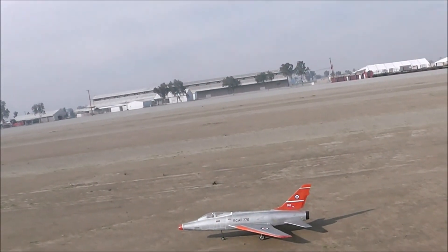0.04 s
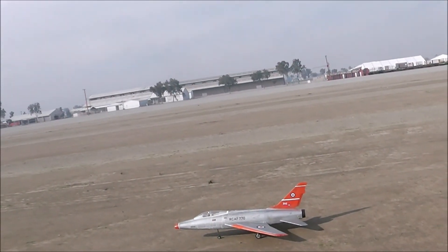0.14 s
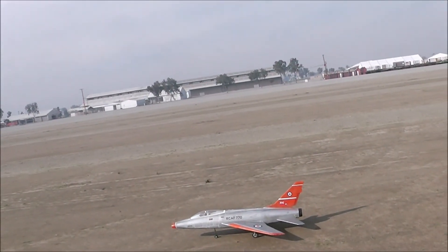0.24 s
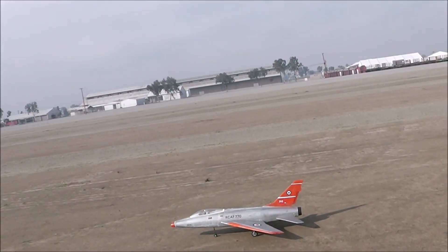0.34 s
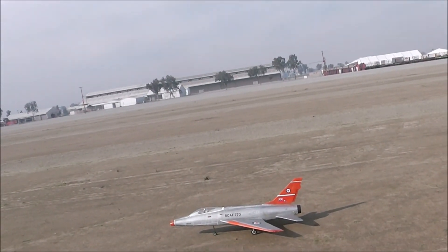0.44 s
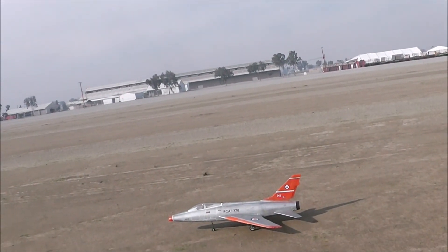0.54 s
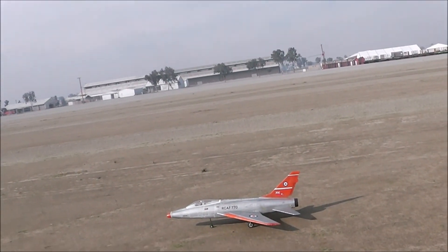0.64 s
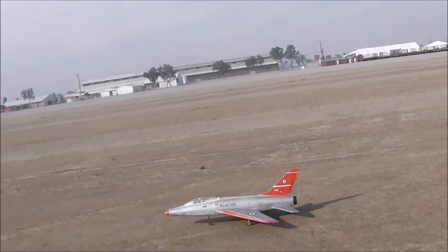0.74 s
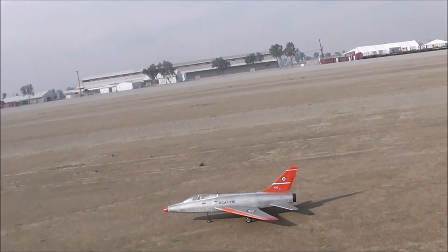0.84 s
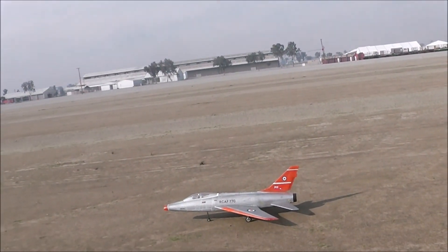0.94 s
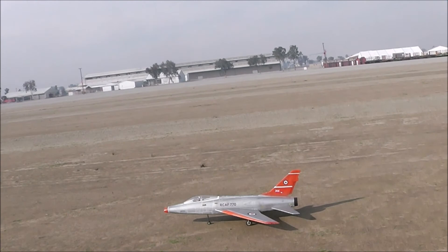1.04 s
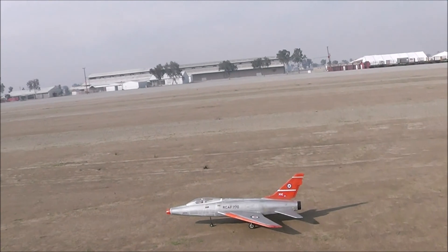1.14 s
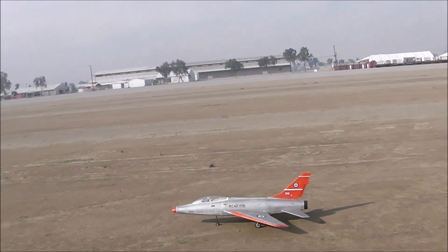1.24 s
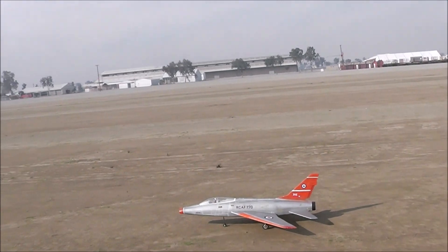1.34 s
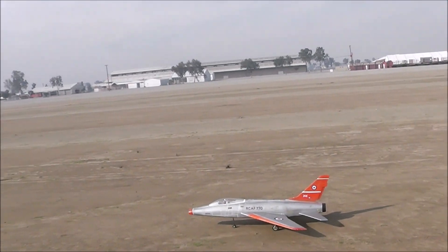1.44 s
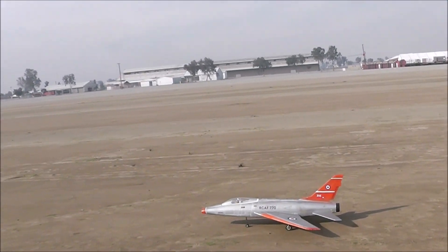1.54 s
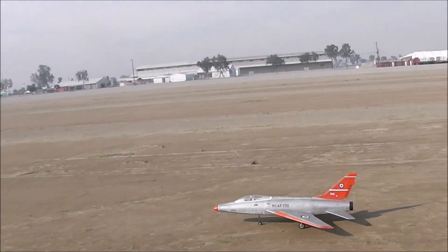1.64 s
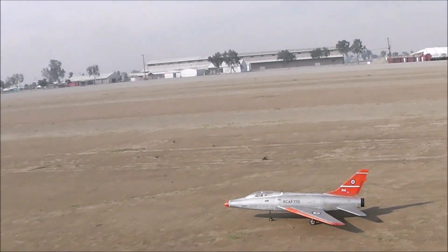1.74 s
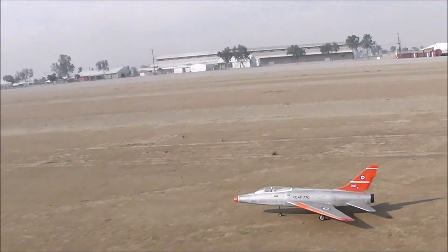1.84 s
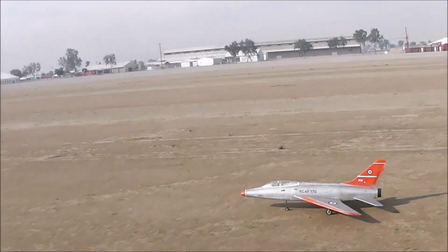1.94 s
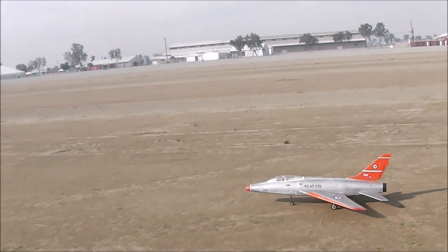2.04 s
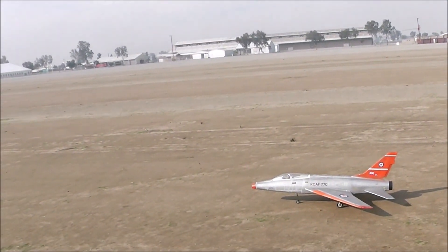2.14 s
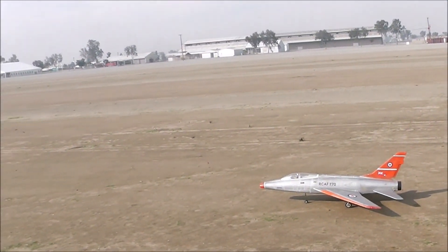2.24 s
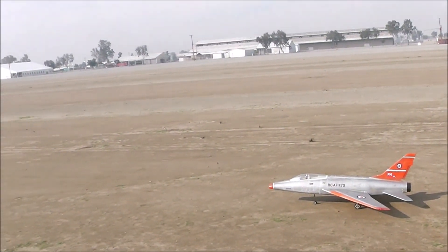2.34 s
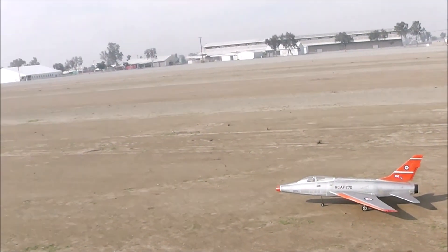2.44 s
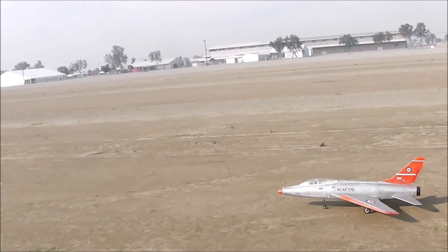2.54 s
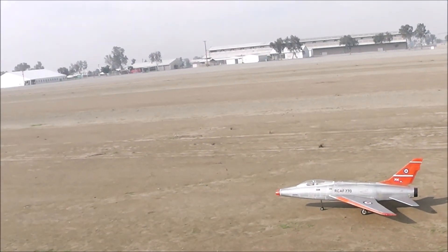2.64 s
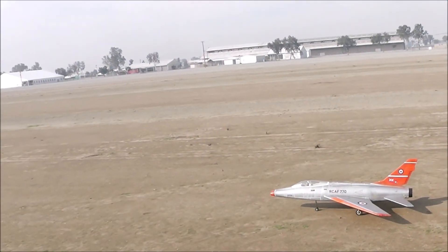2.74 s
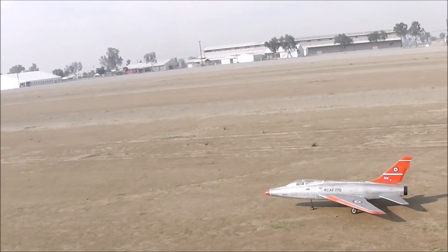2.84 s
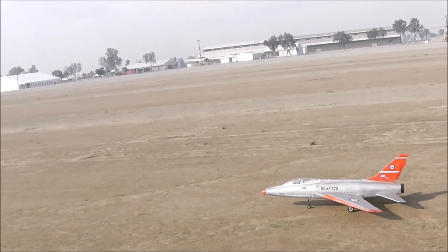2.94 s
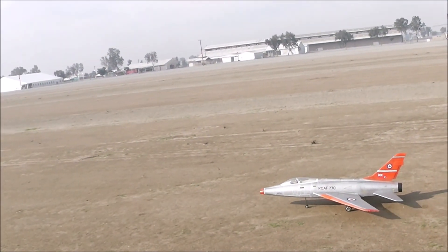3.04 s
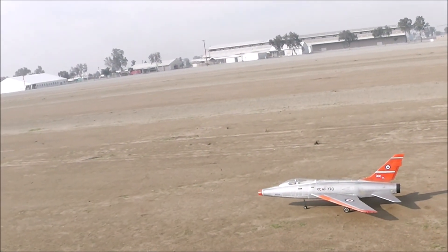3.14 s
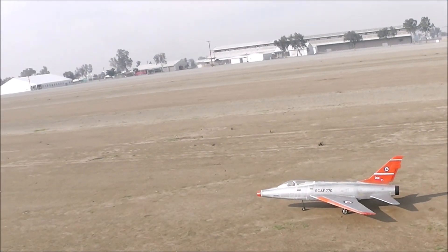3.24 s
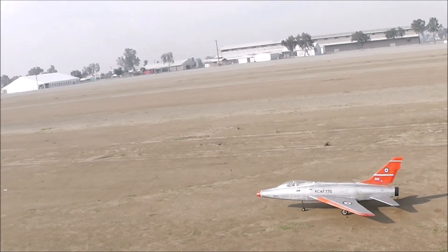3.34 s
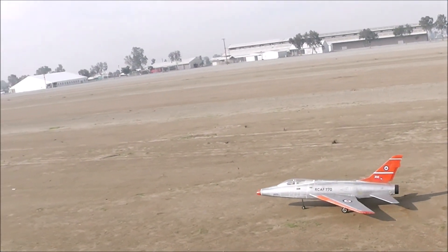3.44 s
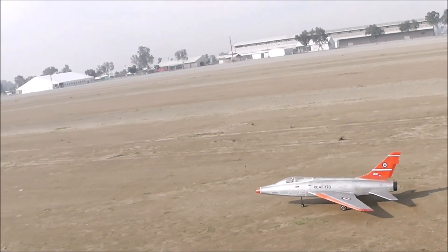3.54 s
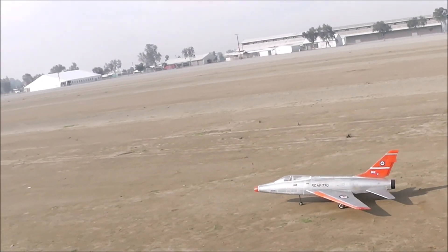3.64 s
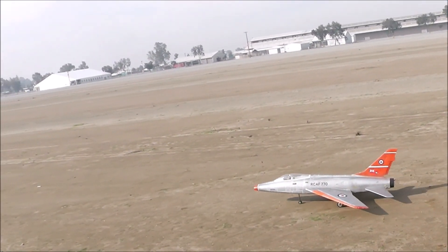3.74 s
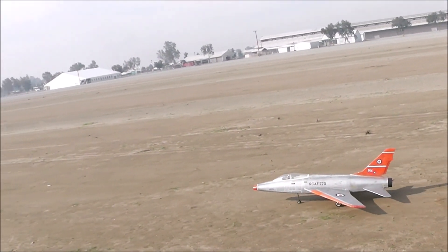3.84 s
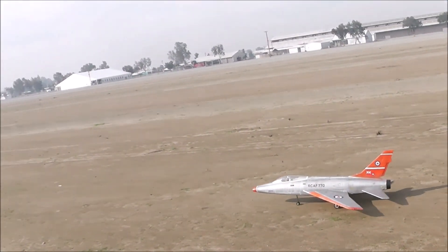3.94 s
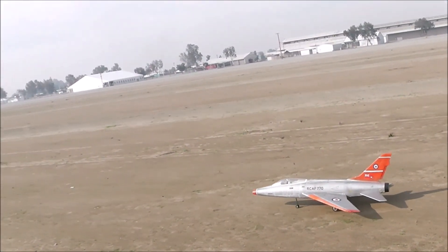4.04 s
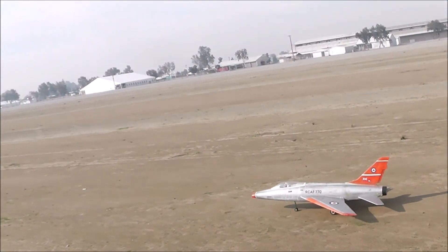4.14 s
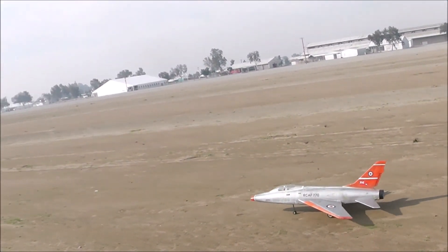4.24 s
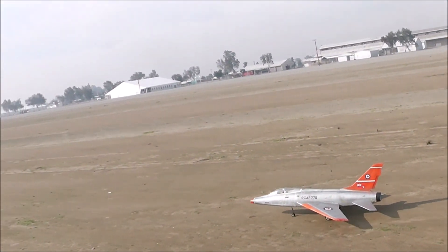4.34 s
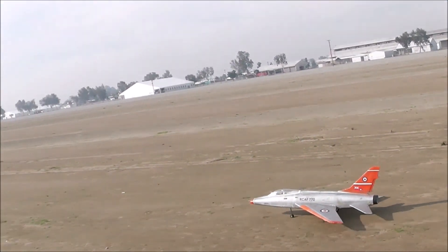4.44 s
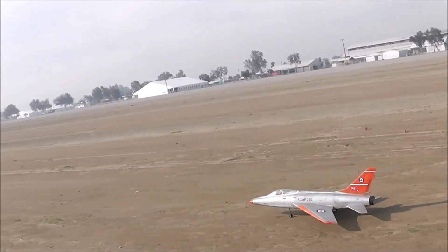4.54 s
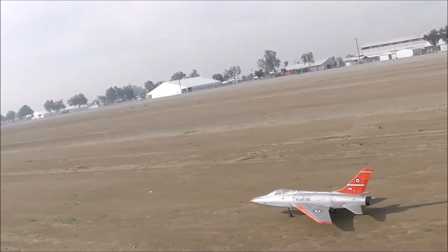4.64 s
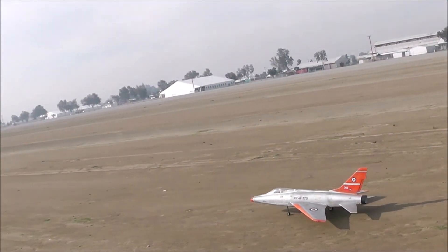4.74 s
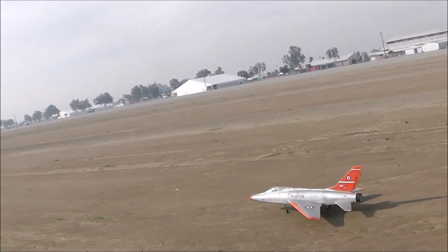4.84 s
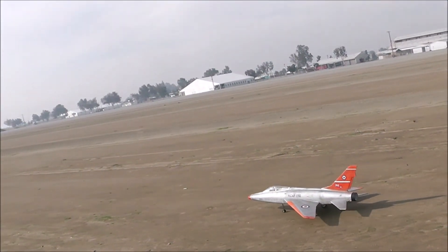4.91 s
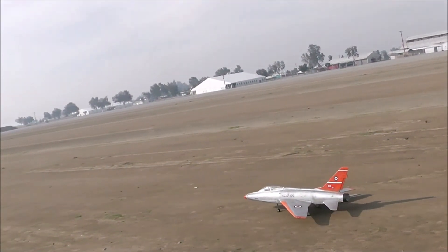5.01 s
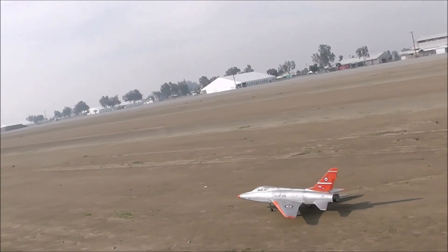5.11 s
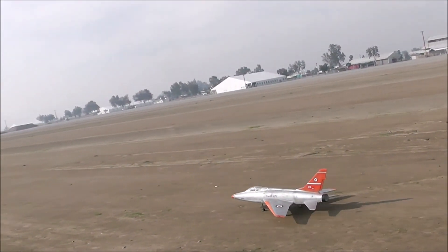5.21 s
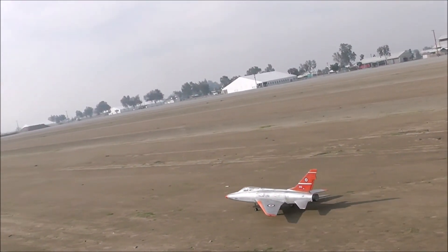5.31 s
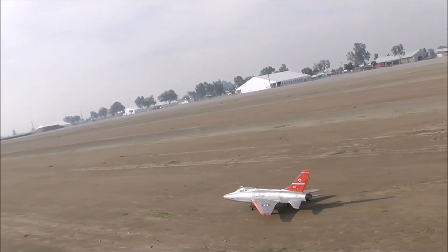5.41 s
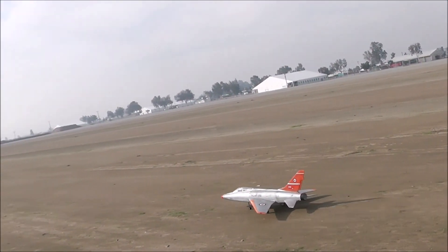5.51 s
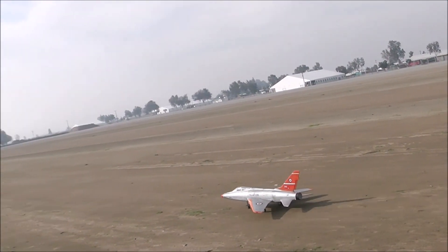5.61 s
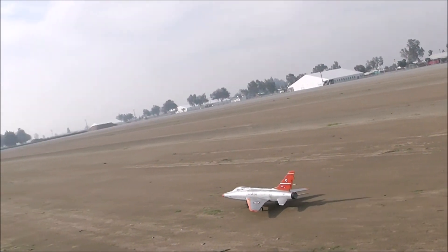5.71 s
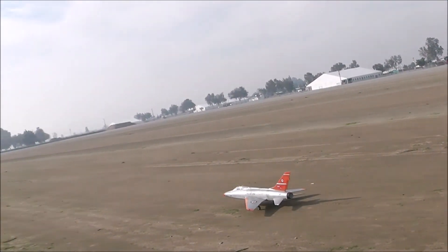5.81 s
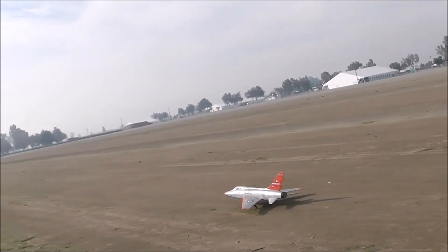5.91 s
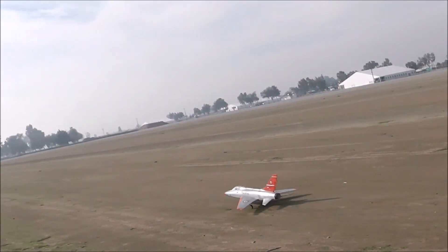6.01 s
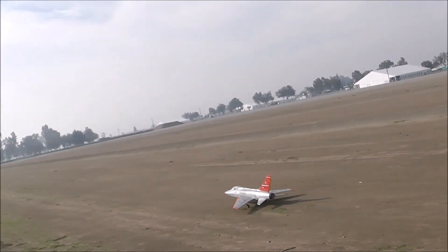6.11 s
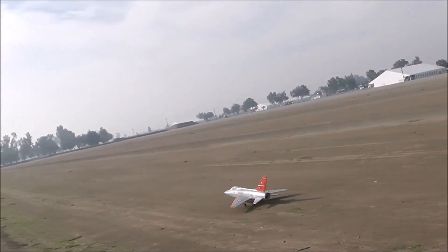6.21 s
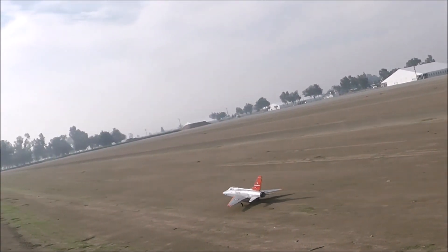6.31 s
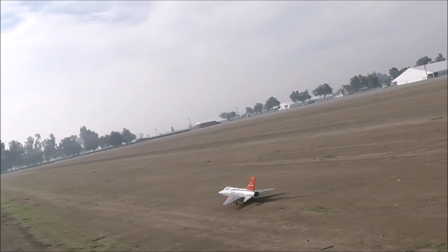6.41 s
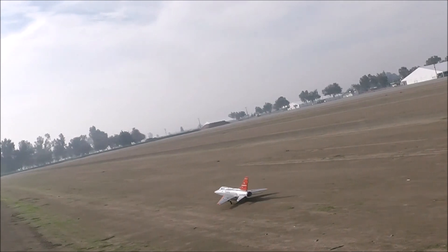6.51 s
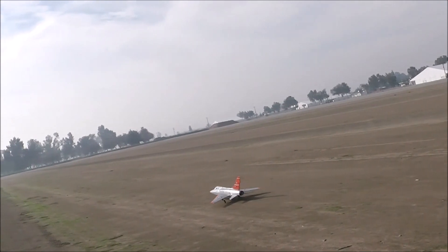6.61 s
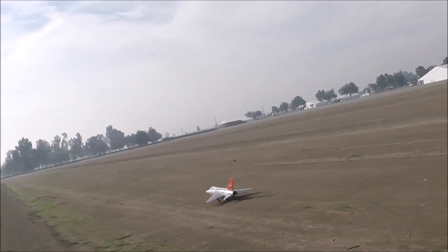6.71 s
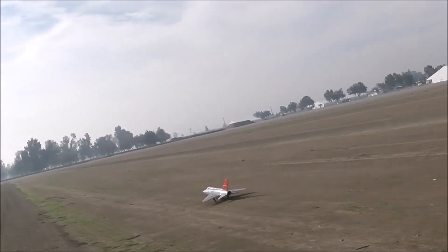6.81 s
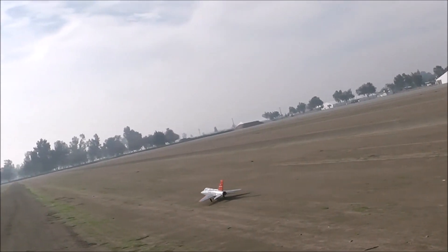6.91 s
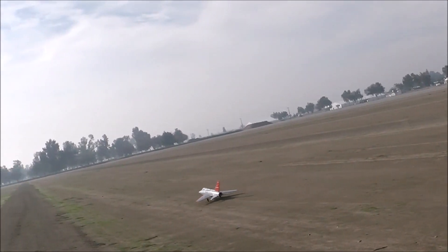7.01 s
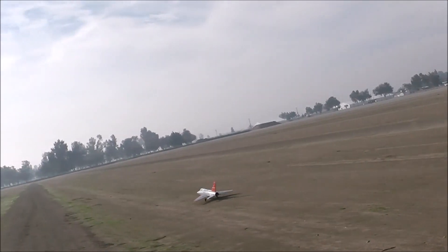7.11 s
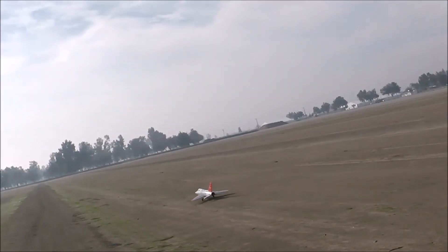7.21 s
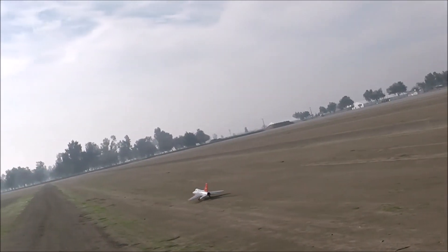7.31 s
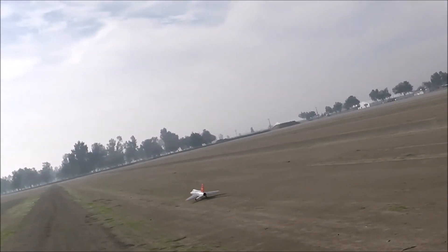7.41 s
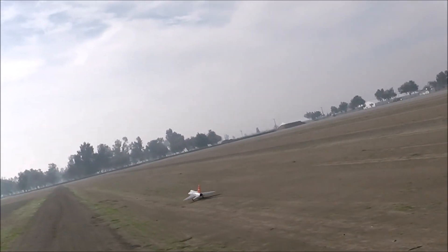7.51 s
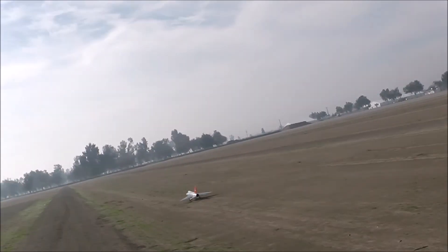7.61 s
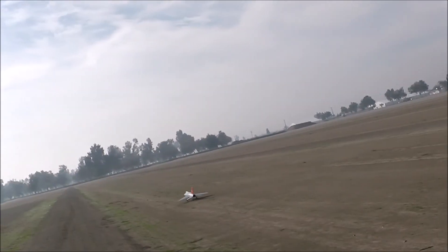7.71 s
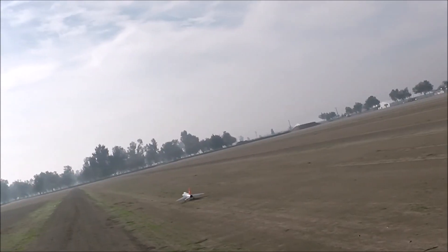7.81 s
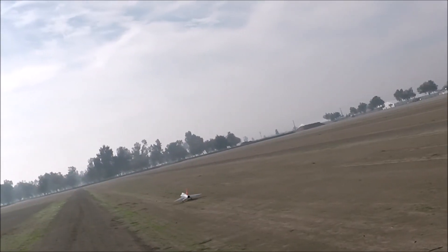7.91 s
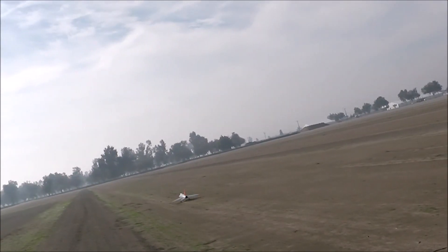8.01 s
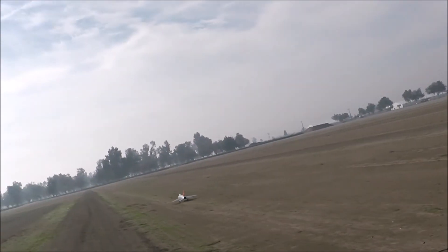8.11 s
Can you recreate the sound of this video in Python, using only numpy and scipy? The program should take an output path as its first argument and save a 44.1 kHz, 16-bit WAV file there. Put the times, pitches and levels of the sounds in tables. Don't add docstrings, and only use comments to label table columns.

```python
import sys
import numpy as np
from scipy import signal
from scipy.fft import rfft, irfft
from scipy.io import wavfile
from scipy.ndimage import uniform_filter1d, map_coordinates

SR = 44100
rng = np.random.default_rng(int(sys.argv[2]) if len(sys.argv) > 2 else 0)


def transcribe(signal):
    frames = np.atleast_2d(signal).T
    limited = np.clip(frames, -1, 1)
    pcm = np.round(limited * 32767).astype(np.int16)
    wavfile.write(sys.argv[1], SR, pcm)


def to_linear_factor(level_db):
    exponent = np.asarray(level_db, float) / 20
    return 10 ** exponent


N = 359944
START_HZ, EASE, CRUISE_HZ = 56, 1.8, 324
PANEL_FADE_DB, PANEL_FADE_RATE = 1, 5
WHINE_FADE_DB, WHINE_FADE_RATE = 3, 7
FAR_LOSS_DB_PER_KHZ = 0.03
FAR_FROM_S = 5.95
DUCT_TOP_HZ, DUCT_TOP_DB_PER_KHZ = 15400, -22

# (time [s], shaft speed it settles at [Hz], time to get there [s])
THROTTLE = [(1.115, 134.1, .17), (1.3, 149.5, 0.2), (1.63, 181.9, .13), (1.72, 196.9, .28),
            (1.972, 216, 0.18), (2.165, 232.5, 0.34), (2.52, 245, 0.18), (2.72, 254, 0.15),
            (2.91, 261.5, 0.088), (3.05, 276, 0.13), (3.27, 291.3, .15), (3.865, 303, 0.084),
            (3.95, 297.5, 0.077), (4.735, 318, 0.13), (4.831, 368, 0.15), (5.045, 387, .09),
            (5.15, 391.5, .3), (5.449, 388.5, 0.67), (5.945, 405, .13), (6.14, 415.5, 0.078),
            (6.291, 426.5, 0.16), (6.5, 431, .2), (6.771, 437, .09), (6.96, 440.5, 0.22), (7.265, 446, .1),
            (7.4, 444.8, 0.52), (7.849, 450.5, .1)]
# (time [s], level [dB])
HUM = [(1.08, -48), (1.6, -29.5), (1.74, -16.5), (1.9, -18.5), (2.2, -13.5), (2.43, -17), (2.85, -7),
       (3.3, -6), (3.48, -10), (3.85, -10), (4.13, -17), (4.57, -12.5), (4.78, -15.5), (4.93, -9.5),
       (5.7, -8.5), (6.4, -17), (6.7, -21), (8.16, -25.5)]
# (time [s], width [s], depth [dB])
HUM_NULLS = [(2.01, 0.034, -9), (3.05, 0.032, -1), (4.07, 0.045, -3), (4.83, 0.037, -10), (6.08, 0.1, -11),
             (6.63, 0.053, -7.5)]
# (beats a turn, level at cruise [dB], slope below cruise [dB per octave], change when away [dB])
OVERTONES = [
    (2, -20, 9, -2),
    (3, -28, 11, 24.5),
    (4, -24.5, 19, -15.5),
    (5, -31.5, 10, -9.5),
    (6, -28, 9, -21),
    (7, -31.5, 3.5, -3),
]
# (pitch [Hz], width [Hz], gain [dB])
AIRFRAME = [(348, 48, -1), (483.6, 23.3, 4), (531, 15, 2.5), (602, 24, -3.5), (800, 61, 4.5),
            (882, 46, -1.5), (1170, 210, -1.5), (1252.6, 70, 2.5), (1490, 140, 0), (1727, 71, -0.5),
            (2090, 63, -1)]
# (boost of every third beat [dB], fade start [s], fade length [s])
COGGING = (8.8, 1.65, 0.4)
# (time [s], duration [s], gain [dB])
CASING_HIDDEN = (4.86, 0.042, -29)
# (time [s], duration [s], gain [dB])
PANELS_HIDDEN = (6.5, 0.066, -15)
# (time [s], duration [s], gain [dB])
CASING_FACES = (3.95, 0.61, 9.9)
# (beats a turn, level at cruise [dB], slope below cruise [dB per octave], change when away [dB])
BLADE_TONES = [
    (12, -36.5, 5, 24),
    (24, -28.5, 22.5, 8),
    (36, -26, 34, -8),
]
# (pitch [Hz], width [Hz], gain [dB])
DUCT = [(1000, 200, 10), (1550, 210, 7.5), (2800, 130, -2.5), (3580, 400, -2.5), (4200, 460, 1),
        (4780, 230, 1.5), (5094, 105, 10.5), (5700, 2100, 1.5), (7400, 4400, -1.5), (8650, 2870, 3.5),
        (11260, 482, -1.5), (14800, 2230, -5)]
# (time [s], gain [dB])
BEAM = [(1.08, -1.7), (1.6, -0.5), (2.1, -1), (2.4, 7.5), (3.2, -0.5), (3.45, -14), (3.75, 3.5), (4.8, 3),
        (5.0, 4.2), (5.4, -0.5), (5.75, 0), (6.8, 2), (7.8, 1), (8.16, -4)]
# (time [s], level [dB])
UNEQUAL_BLADES = [(4.7, -80), (5.15, -32), (6.25, -29), (6.7, -80)]
# (time [s], pitch [Hz], level [dB])
WHISTLE = [(1.065, 11860, -52), (1.15, 11900, -43), (1.7, 11840, -47), (2.1, 11810, -51), (2.6, 11860, -37),
           (2.9, 12100, -44), (3.1, 12000, -54), (4.8, 11800, -52), (5.0, 11770, -71)]
# (time [s], level [dB], away [0-1])
FLOW = [(1.1, -34, 0.4), (1.25, -18, 0.28), (1.6, -13, 0.27), (1.72, -9.5, 0.06), (2.3, -5, 0),
        (2.95, -1, 0.04), (3.4, -0.5, 0.05), (3.95, 1.2, 0.05), (4.5, 0.5, 0), (4.9, 2.5, 0.11),
        (5.15, -1.5, 0.16), (5.65, 2.5, .4), (6.2, 2.5, 0.47), (6.7, 0, 0.57), (6.8, 3, 0.45),
        (7.1, 1.35, 0.31), (7.8, -4, 0.13), (8.16, -5.5, 0.2)]
# (level at full flow [dB], follow [dB per dB of flow], change when away [dB], drift once far [dB per s])
AIR_LAYERS = [
    (-23, 1.09, -15.5, 0.5),
    (-22, 0.95, -9, 4.5),
    (-35, 0.8, -16.5, 0.5),
    (-26, 1.1, 2, -.3),
    (-26.5, 1.18, -0.5, 0.4),
]
AIR_TRIM_DB = (0, 1, 5.5, 0.0, 0.5)
AIR_CENTRES_HZ = (330, 1100, 2800, 5800, 11500)
# (pitch [Hz], density [dB per Hz])
AIR_COLOUR = [(100, -22.5), (200, -8), (420, 0), (700, -6), (1250, 0.5), (1800, -5.5), (2400, -14.5),
              (2900, -18.5), (3250, -24.5), (3700, -13.5), (5000, -8.5), (7500, -7.5), (10500, -4.5),
              (12500, -15.5), (16000, -16.5)]
# (boost [dB], t60 [s])
LURCH = (24.6, 1)
# (time [s], first cancelled pitch [Hz], share [0-1])
GROUND = [(4.6, 1571, 0.07), (5.0, 1796, 0.33), (5.5, 1940, 0.3), (5.8, 2262, 0.37), (6.2, 2378, 0.44),
          (6.5, 2980, 0.42), (7.0, 3403, 0.24), (8.16, 4367, 0)]
# (time [s], peak [dB], pitch [Hz], t60 [s], crack [dB])
JERKS = [(1.0647, -4.5, 380, 0.033, -31.5), (1.084, -13.5, 404, 0.15, -28), (1.0985, -22, 475, 0.077, -9),
         (1.116, -12.5, 346, 0.13, -29), (1.128, -13.5, 423, 0.15, -29), (1.153, -18, 468, 0.056, -17),
         (1.166, -16.5, 514, 0.087, -19)]
# (time [s], peak [dB], pitch [Hz])
TICKS = [(0.0324, -52, 4180), (0.385, -33, 3920), (0.406, -43, 3810), (0.4304, -41, 3970),
         (0.4524, -41, 5340), (0.4723, -42, 3770), (0.4958, -38.5, 3700), (0.5412, -47, 3890),
         (0.6325, -41, 4440), (0.6554, -40, 3940), (0.6893, -49, 3530), (0.7437, -43, 5990),
         (0.7672, -32.5, 3900), (0.7881, -43, 5860), (0.835, -34, 5630), (0.8649, -48, 3470),
         (0.9482, -45, 3380)]
# (start [s], rate [Hz], pitch [Hz], level [dB], t60 [s])
LENS = (.682, 60.05, 3550, -47, .014)
# (pitch [Hz], gain [dB])
TICK_COLOUR = [(900, -24), (1800, 10.0), (2800, -11), (5500, -1), (14000, -22)]
# (pitch [Hz], gain [dB])
JERK_COLOUR = [(500, -17), (1300, 16), (2000, -11), (2800, -30), (5500, -12), (14000, -35)]
# (time [s], level [dB])
FIELD = [(0, -34), (1.0, -32), (2.0, -27.5), (3.0, -28.5), (4.8, -30.5), (5.05, -40.5), (6.3, -38),
         (6.7, -38), (7.1, -33), (8.16, -29.5)]
# (pitch [Hz], density [dB per Hz])
FIELD_COLOUR = [(15, -40), (35, -10), (65, -5), (105, -7), (160, -11), (230, -16), (450, -23), (860, -24),
                (1300, -28), (1900, -44), (2500, -57.5), (4500, -57.5), (6000, -53.5), (7500, -59.5),
                (16000, -59.5)]
# (pitch [Hz], level [dB])
FAR_ENGINE = [(97, -11), (70.2, -17)]
# (pitch [Hz], left minus right [dB])
PORT_DB = [(100, 1.64), (700, -1.5), (1800, -0.5), (2400, 2), (4200, -3.5), (5500, -3), (8500, -7),
           (12000, -6.5), (15000, 3.5)]
# (pitch [Hz], lead of the left [rad])
PORT_RAD = [(4000, 0), (11000, -0.22), (12000, 0.33), (12600, 0.51), (14000, 0.93), (15800, 1.3)]
# (pitch [Hz], side minus mid [dB])
AIR_SIDE = [(300, -38), (2000, -22), (3000, -40), (7000, -20), (12000, -7), (16000, -21)]
# (pitch [Hz], side minus mid [dB])
FIELD_SIDE = [(60, -29), (200, -29), (700, -16), (1300, -15), (2400, 2), (8000, -2), (15000, 0)]
# (time [s], shading by the camera body [dB], top octave difference [dB])
BEARING = [(0, -5.5, 2), (4.8, -3.5, 7.5), (5.1, -4.5, 2.5), (6.0, -6, 2), (6.5, -13, -1.5),
           (8.16, -14, -6)]
# (pitch [Hz], share [0-1])
SHADED_BAND = [(5200, 0), (6000, 1), (9800, 1), (11000, 0)]
# (pitch [Hz], share [0-1])
TOP_BAND = [(9800, 0), (11000, 1)]

T = np.arange(N) / SR
HZ = np.maximum(np.arange(N // 2 + 1) * SR / N, 1)


def columns(table):
    s, *rest = np.transpose(table)
    return [np.interp(T, s, c) for c in rest]


def shape(table):
    hz, value = np.transpose(table)
    return np.interp(np.log(HZ), np.log(hz), value)


def noise(gain):
    x = irfft(rfft(rng.standard_normal(N)) * gain, N)
    return x / np.std(x)


def walk(rate):
    hold = int(SR / rate)
    steps = np.repeat(rng.standard_normal(N // hold + 1), hold)
    x = uniform_filter1d(uniform_filter1d(steps, hold), hold)[:N]
    return x / np.std(x)


def onset(s, rise_s):
    return np.clip((T - s) / rise_s, 0, 1)


def swing(s, over_s, db):
    return db * onset(s, over_s)


def tones(turns, orders, levels_db, flutter_db, rate, smear):
    out = 0
    for k, db in zip(orders, levels_db):
        flutter = flutter_db * (walk(rate) + walk(4 * rate)) / 2
        phase = 2 * np.pi * k * turns + smear * walk(rate) + k
        out = out + np.sqrt(2) * to_linear_factor(db + flutter) * np.sin(phase)
    return out


def ringing(modes, hz):
    return 10 * np.log10(sum(to_linear_factor(db) ** 2 / (1 + (2 * (hz - f) / w) ** 2) for f, w, db in modes))


def stack(rows, modes, hz, fade_db, rate):
    below = np.minimum(np.log2(hz / CRUISE_HZ), 0)
    away = columns(FLOW)[1]
    return [db + slope * below + away_db * away + ringing(modes, round(k) * hz) - fade_db * walk(rate) ** 2
            for k, db, slope, away_db in rows]


def shaft():
    s, hz, rise = np.transpose(THROTTLE)
    change = np.diff(hz, prepend=START_HZ)
    return START_HZ + sum(d * (1 - (1 - onset(a, r)) ** EASE) for a, d, r in zip(s, change, rise))


def airframe_hum(shaft_hz, turns):
    cog_db = COGGING[0] * (1 - onset(*COGGING[1:]))
    shake_db = stack(OVERTONES, AIRFRAME, shaft_hz, PANEL_FADE_DB, PANEL_FADE_RATE)
    shake_db = [db + cog_db * (k % 3 == 0) for k, db in zip(range(2, 8), shake_db)]
    panels_db = [db + swing(*PANELS_HIDDEN) for db in shake_db[:3]]
    casing_db = [db + swing(*CASING_HIDDEN) for db in shake_db[3:]]
    casing_db[0] = casing_db[0] + swing(*CASING_FACES)
    nulls_db = sum(db * np.exp(-((T - s) / width) ** 2) for s, width, db in HUM_NULLS)
    hum_db = columns(HUM)[0] + nulls_db
    rotor = tones(turns, range(1, 5), [hum_db] + panels_db, flutter_db=2.0, rate=30, smear=0.18)
    casing = tones(turns, range(5, 8), casing_db, flutter_db=4.5, rate=30, smear=0.74)
    return rotor + casing


def magnet_cogging(turns):
    level_db = -35 - 40 * onset(1.68, 0.17) - 12 * (T < 1.3)
    return tones(turns, [9], [level_db], flutter_db=2, rate=22, smear=0.6)


def blade_whine(shaft_hz, turns):
    speeding = uniform_filter1d(np.gradient(shaft_hz) * SR, size=2000)
    hunting = turns + (.004 + np.clip(speeding, 0, 400) / 6e4) * walk(120)
    far_db = -FAR_LOSS_DB_PER_KHZ * np.clip(T - FAR_FROM_S, 0, None) * shaft_hz / 1e3
    beam_db = columns(BEAM)[0]
    orders = (12, 24, 36)
    blades_db = []
    for k, db in zip(orders, stack(BLADE_TONES, DUCT, shaft_hz, WHINE_FADE_DB, WHINE_FADE_RATE)):
        top_db = DUCT_TOP_DB_PER_KHZ * np.clip(k * shaft_hz - DUCT_TOP_HZ, 0, None) / 1e3
        blades_db.append(db + beam_db + k * far_db + top_db)
    blades = tones(hunting, orders, blades_db, flutter_db=3.3, rate=75, smear=.55)
    beside_db = columns(UNEQUAL_BLADES)[0] - 7
    beside = tones(hunting, (13, 23), [beside_db, beside_db], flutter_db=4, rate=70, smear=1.2)
    return blades + beside


def controller_whistle():
    hz, db = columns(WHISTLE)
    return tones(np.cumsum(hz) / SR, [1], [db], flutter_db=4, rate=60, smear=.9)


def motor(shaft_hz, turns):
    spinning = airframe_hum(shaft_hz, turns) + magnet_cogging(turns) + blade_whine(shaft_hz, turns)
    return onset(1.09, 0.034) * spinning + onset(1.065, .003) * controller_whistle()


def air_levels():
    flow_db, away = columns(FLOW)
    far_s = np.clip(T - FAR_FROM_S, 0, None)
    lurch_db = LURCH[0] * 1000. ** (-np.clip(T - FLOW[0][0], 0, None) / LURCH[1])
    return [db + follow * flow_db + away_db * away + far_db * far_s + lurch_db * (k < 2)
            for k, (db, follow, away_db, far_db) in enumerate(AIR_LAYERS)]


def air(turns, colour_db):
    gust, out = walk(9), 0
    colour = to_linear_factor(shape(AIR_COLOUR))
    place = np.interp(np.log(HZ), np.log(AIR_CENTRES_HZ), range(5))
    for k, (db, trim_db) in enumerate(zip(air_levels(), AIR_TRIM_DB)):
        gain = np.cos(np.pi / 2 * np.clip(np.abs(place - k), 0, 1)) * colour
        coloured = gain * to_linear_factor(colour_db)
        loss = np.linalg.norm(coloured) / np.linalg.norm(gain)
        level = to_linear_factor(db + trim_db + 0.21 * gust + 0.98 * walk(20))
        out = out + loss * noise(coloured) * level
    return onset(1.08, 0.028) * out * (1 + 0.17 * np.sin(2 * np.pi * turns))


def ground(x):
    notch_hz, share = columns(GROUND)
    late = map_coordinates(x, [np.arange(N) - SR / (2 * notch_hz)], order=3)
    late = (late + uniform_filter1d(late, size=3)) / 2
    return (x + share * late) / np.sqrt(1 + share ** 2)


def add_mode(out, s, db, hz, t60):
    t = np.arange(int(t60 * SR)) / SR
    i = int(s * SR)
    attack = np.minimum(t * hz / 1.9, 1)
    out[i:i + len(t)] += to_linear_factor(db) * np.sin(2 * np.pi * hz * t) * 1000. ** (-t / t60) * attack


def crack(s, db, t60, colour):
    return to_linear_factor(db) * colour * (T >= s) * 1000. ** (-np.clip(T - s, 0, 1) / t60)


def rotor_jerks(out):
    dull = noise(to_linear_factor(shape(JERK_COLOUR)))
    for s, db, hz, t60, crack_db in JERKS:
        add_mode(out, s, db, hz, t60)
        out += crack(s, db + crack_db + 6, .03, dull)


def servo_ticks(out):
    bright = noise(to_linear_factor(shape(TICK_COLOUR)))
    for s, db, hz in TICKS:
        add_mode(out, s, db - 8, hz, .025)
        out += crack(s, db - 4.0, 0.025, bright)


def lens_motor(out):
    start, rate, hz, db, t60 = LENS
    for s in np.arange(start, 2, 1 / rate):
        add_mode(out, s, db, hz, t60)


def knocks():
    out = np.zeros(N)
    rotor_jerks(out)
    servo_ticks(out)
    lens_motor(out)
    return out


def field():
    colour = to_linear_factor(shape(FIELD_COLOUR))
    mid = noise(colour) * to_linear_factor(0.81 * walk(5.86))
    side = noise(colour * to_linear_factor(shape(FIELD_SIDE))) * to_linear_factor(-21.5)
    engine = sum(tones(hz * T, [1], [db], flutter_db=8, rate=5, smear=1.74) for hz, db in FAR_ENGINE)
    return to_linear_factor(columns(FIELD)[0] + 1.5) * (mid + engine + side * np.array([[1], [-1]]))


def scene():
    shaft_hz = shaft()
    turns = np.cumsum(shaft_hz) / SR
    jet = rfft(motor(shaft_hz, turns) + ground(air(turns, 0)) + knocks())
    left = to_linear_factor(shape(PORT_DB) / 2) * np.exp(.5j * shape(PORT_RAD))
    mid = irfft(jet * (left + 1 / left) / 2, N)
    side = jet * (left - 1 / left) / 2 + rfft(air(turns, shape(AIR_SIDE)))
    shaded, top = shape(SHADED_BAND), shape(TOP_BAND)
    shading_db, top_db = columns(BEARING)
    side = (irfft(side * (1 - shaded - top), N)
            + to_linear_factor(shading_db) * irfft(side * shaded, N)
            + to_linear_factor(top_db) * irfft(side * top, N))
    return mid + side * np.array([[1], [-1]]) + field()


def band_limit(x):
    return signal.sosfilt(signal.butter(12, 16040, fs=SR, output="sos"), x)


def record(dry):
    rounded = np.tanh(0.56 * dry) / 0.64
    top_cut = signal.ellip(10, .2, 70, 16000, fs=SR, output="sos")
    mix = signal.sosfilt(top_cut, rounded)
    return band_limit(mix)


dry = scene()
out = record(dry)
transcribe(out)
```